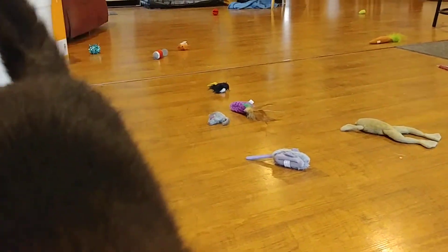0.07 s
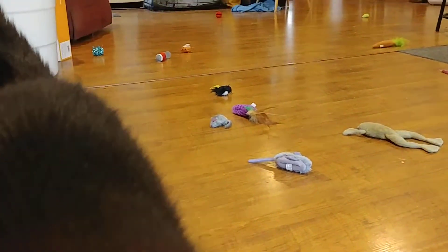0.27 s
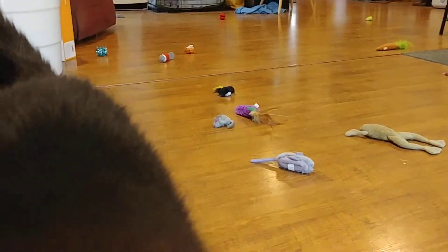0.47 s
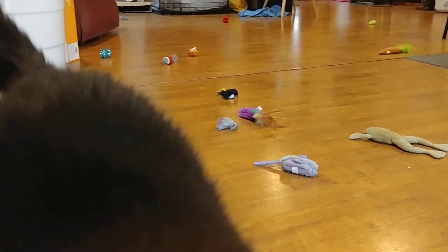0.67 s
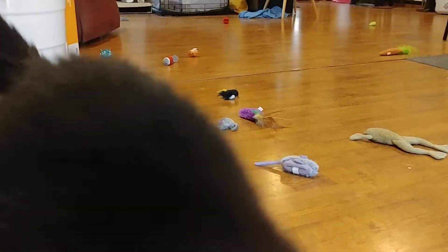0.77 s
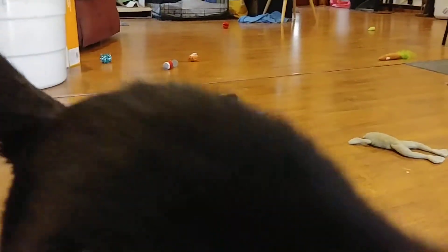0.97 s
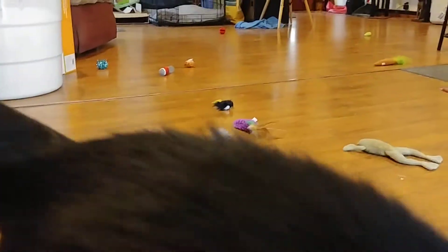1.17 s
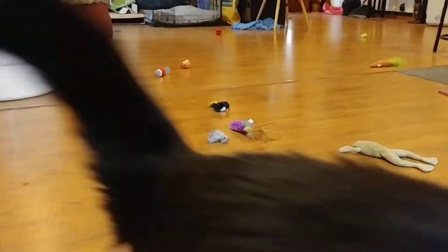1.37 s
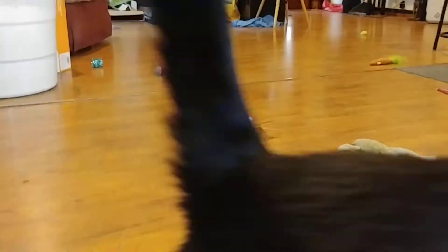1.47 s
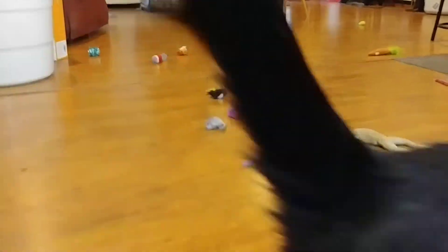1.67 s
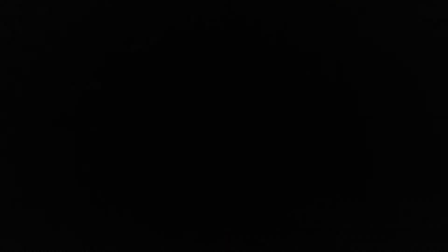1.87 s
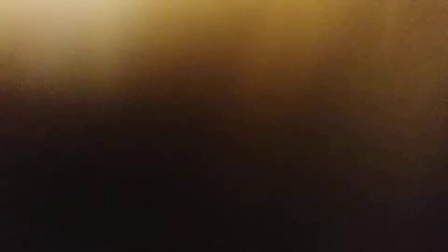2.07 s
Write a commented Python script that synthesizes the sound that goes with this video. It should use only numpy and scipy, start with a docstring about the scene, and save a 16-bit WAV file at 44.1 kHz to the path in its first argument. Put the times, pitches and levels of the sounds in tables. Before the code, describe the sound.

Fur brushes right on a phone's microphone indoors, faint over a low hum. A soft knock and a few muffled paw steps pass before a sudden overloaded thump and a rough, rumbling rub that shifts between left and right.

```python
"""A quiet room, where a cat walks along a phone. Its fur whispers over the left microphone port,
and something knocks softly on the case and bounces. Then the cat bumps into the phone: its coat
scrapes across the left port, the right port and the left again, pushing in puffs of air that
boom and briefly overload the microphones. Paw steps, floor scuffs and a low hum lie behind."""
import sys
import numpy as np
from scipy import signal
from scipy.fft import rfft, irfft
from scipy.io import wavfile

SR = 44100
rng = np.random.default_rng(int(sys.argv[2]) if len(sys.argv) > 2 else 0)


def bounce(signal):
    """Save signal as a 16-bit WAV file at the path given by the first command-line argument."""
    frames = np.transpose(np.atleast_2d(signal))
    limited = np.clip(frames, -1, 1)
    pcm = np.round(limited * 32767).astype(np.int16)
    wavfile.write(sys.argv[1], SR, pcm)


N = 92786
T, FREQS = np.arange(N) / SR, np.fft.rfftfreq(N, 1 / SR)


# coat pressed on the ports (time [s], left level [dB], right level [dB])
COAT_LEVELS = [(1.64, -70.5, -69.5), (1.731, -63, -68), (1.739, -32.5, -67), (1.752, -33.5, -30),
               (1.778, -36, -38), (1.803, -25, -36), (1.83, -35.5, -34), (1.87, -37.5, -27.5),
               (1.9, -44.5, -31.5), (1.96, -47, -36.5), (2.0, -46.5, -36), (2.035, -54, -46),
               (2.06, -42.5, -46), (2.1, -28, -37.5)]
# case rumbling as the cat leans on it (time [s], level [dB])
RUMBLE_LEVELS = [(1.68, -63), (1.75, -20.5), (1.87, -27.5), (1.94, -33), (2.1, -42)]
# spectra of the scrape at each port and of the rumble (frequency [Hz], gain [dB])
LEFT_SPECTRUM = [(250, -1.5), (450, 9.5), (650, 1.5), (950, 1.5), (1800, -4), (3000, -0.5), (4800, -0.5),
                 (6600, -10), (8000, -8.5), (9200, -25.5), (10200, -57), (12500, -36.5), (15500, -42)]
RIGHT_SPECTRUM = [(250, 4.5), (500, -4), (730, 2), (810, 0.5), (890, 1.5), (1050, -3), (1400, -3),
                  (1900, -9), (2500, -4), (2950, -7.5), (3400, -8.5), (4200, -10.5), (5500, -16.5),
                  (7000, -25.5), (8300, -21), (9400, -31.5), (10200, -56), (15500, -43)]
RUMBLE_SPECTRUM = [(40, 18), (90, -7), (160, 0), (300, -23), (700, -71), (2000, -60)]

def coat_scrape():
    """Sliding friction: the pressed coat scratches each port separately and makes the case rumble."""
    rumble = envelope(RUMBLE_LEVELS) * stereo_noise(RUMBLE_SPECTRUM)
    left = envelope(COAT_LEVELS, column=1) * hair_friction(LEFT_SPECTRUM)
    right = envelope(COAT_LEVELS, column=2) * hair_friction(RIGHT_SPECTRUM)
    return np.array([left, right]) + rumble


def hair_friction(spectrum, flicks_per_s=5000, flick_share=0.4, spread_db=0.5, flutter_db=1.7):
    """Shot noise: hairs flick over a port's edge in clumps, above a smooth sliding hiss."""
    flicks = (rng.random(N) < flicks_per_s / SR) * rng.choice([-1, 1], N)
    strength = amp(spread_db * np.minimum(rng.exponential(1, N), 5))
    hiss = rng.standard_normal(N)
    drive = np.sqrt(flick_share) * unit(flicks * strength) + np.sqrt(1 - flick_share) * hiss
    clumping = amp(flutter_db * wander(rate_hz=270))
    return colour(drive * clumping, spectrum)


# air pushed into the ports (time [s], half width [ms], left level [dB], right level [dB])
PUFFS = [(.323, 1.04, -56, -37), (0.599, 1.29, -53, -35.5), (0.95, 1.37, -49, -39.5),
         (1.364, 1.3, -60, -37.5), (1.7419, 0.78, -7, -50), (1.7471, 1.074, 7, -55), (1.7487, 0.67, -29, 3),
         (1.752, 4.3, -7.5, -5), (1.8227, 1.8, -36, -13), (1.8321, 1.45, -43, -18),
         (1.8396, 1.9, -30, -3.5), (1.8505, 3.14, -28, -1), (2.0198, 1.9, -51, -17)]

def air_puffs(backflow_share=0.63, lag_half_widths=1.69):
    """Compression and release: a touch traps air in a port and lets it go, a bipolar pressure pulse."""
    out = np.zeros((2, N))
    for time, half_width_ms, left_db, right_db in PUFFS:
        half_widths = (T - time) * 1000 / half_width_ms
        push = np.exp(-half_widths ** 2)
        backflow = backflow_share * np.exp(-(half_widths - lag_half_widths) ** 2)
        out += amp([[left_db], [right_db]]) * (backflow - push)
    return out


# the body landing on the phone (time [s], left level [dB], right level [dB])
BUMP = (1.7462, -18, -16.5)
# spectrum of crushed hair (frequency [Hz], gain [dB])
CRUSH_SPECTRUM = [(150, -27.5), (350, -17), (700, 6.5), (1200, 6), (2000, -7.5), (3500, 1.5), (5000, -29),
                  (8000, -21), (11000, -61), (15500, -41)]

def bump_crack(decay_s=.0017):
    """Impact transient: hair crushed against the case gives a burst of noise."""
    time, left_db, right_db = BUMP
    noise = [amp(db) * colour(rng.standard_normal(N), CRUSH_SPECTRUM) for db in (left_db, right_db)]
    return decays([(time, 0)], decay_s) * np.array(noise)


# a knock and its bounces (time [s], relative level [dB], force rise time [ms])
BOUNCES = [(.4339, -17.5, .13), (.4516, -21.5, .17), (.4696, -25, .24), (.5032, -30.5, .3)]
# modes of the case (frequency [Hz], gain [dB], time to fall 60 dB [s])
CASE_MODES = [(88.4, -3, 0.16), (157, 1, 0.072), (340, 1.5, 0.011), (612, 10, 0.008), (930, 0, 0.0098),
              (1970, -8.5, .006)]
# spectrum of the scuff at each contact (frequency [Hz], gain [dB])
SCUFF_SPECTRUM = [(100, 6), (300, 18.5), (600, 5.5), (1200, -7), (2300, -6.5), (3200, -19), (4500, -20),
                  (7000, -28), (15000, -38)]

def case_knock(scuff_db=-27.5):
    """Damped modal vibration: ever softer contacts ring and scuff the case next to the right port."""
    blows = np.zeros(N)
    for time, db, rise_ms in BOUNCES:
        rise_times = T[:SR // 100] * 1000 / rise_ms
        force = rise_times * np.exp(-rise_times)
        add(blows, time, amp(db) * force / force.sum())
    t = T[:SR // 3]
    ring = sum(amp(db - 60 * t / t60) * np.sin(2 * np.pi * hz * t) for hz, db, t60 in CASE_MODES)
    body = signal.fftconvolve(blows, ring)[:N]
    scuff = amp(scuff_db) * decays(BOUNCES, decay_s=0.03) * stereo_noise(SCUFF_SPECTRUM)
    return body * amp([[-28], [0]]) + scuff * amp([[-6], [0]])  # both weaker on the left


# light brushing at the left port (time [s], level [dB])
BRUSH_LEVELS = [(0, -69), (.03, -67.5), (.12, -65.5), (.19, -80), (.275, -79.5), (.322, -63.5), (.39, -83),
                (.45, -71), (.538, -81), (.572, -61), (.602, -55.5), (.64, -58), (.68, -80), (.765, -80),
                (.8, -65), (.85, -67), (.935, -75), (.986, -53), (1.068, -67), (1.2, -61), (1.268, -51),
                (1.315, -72), (1.345, -68), (1.4, -97), (1.61, -84), (1.665, -64), (1.731, -56.5),
                (1.739, -33.5), (1.77, -42.5), (1.81, -39), (1.88, -68)]
# firmer strokes there (time [s], half width [s], level [dB])
FIRM_STROKES = [(.605, 0.026, -62), (.995, 0.031, -66), (1.165, .03, -74), (1.258, 0.026, -77),
                (1.715, 0.035, -74)]
# spectra of light and firm contact (frequency [Hz], gain [dB])
BRUSH_SPECTRUM = [(1500, -28), (3000, -18), (4600, -11.5), (6500, -11), (7300, -7), (7850, 3.5), (8300, -3),
                  (8900, -7.5), (10300, -26.5), (12500, -21), (15000, -14.5)]
SWISH_SPECTRUM = [(800, -2), (1800, -14), (3000, 8), (4600, -2), (6400, 4), (9000, -4.5), (10300, -28),
                  (13000, -8), (15500, -17)]

def fur_brush(right_leak_db=-12):
    """Resonance: hair tips excite a narrow peak of the left port; firm strokes add a broad swish."""
    light, firm = envelope(BRUSH_LEVELS), swells(FIRM_STROKES)
    ports = [light * hair_friction(BRUSH_SPECTRUM) + firm * hair_friction(SWISH_SPECTRUM)
             for _ in range(2)]
    return amp([[0], [right_leak_db]]) * np.array(ports)


# thin squeaks (time [s], half width [s], frequency [Hz], left level [dB], right level [dB])
HAIR_SQUEAKS = [(.005, 0.017, 5350, -67, -73), (1.275, 0.05, 5450, -72, -77),
                (1.349, .02, 5300, -68.5, -78), (1.7, 0.038, 4200, -78, -68.5),
                (1.879, 0.0094, 2500, -45, -47)]

def hair_squeaks(half_band_hz=340):
    """Narrow-band friction noise: hair sliding on the case gives fuzzy whistles."""
    out = np.zeros((2, N))
    hiss_spectrum = rfft(rng.standard_normal((2, N)))
    for time, half_width, hz, left_db, right_db in HAIR_SQUEAKS:
        band = np.exp(-((FREQS - hz) / half_band_hz) ** 2)
        whistle = unit(irfft(hiss_spectrum * band, N))
        out += amp([[left_db], [right_db]]) * swells([(time, half_width, 0)]) * whistle
    return out


# paws landing on the floor (time [s], half width [s], level [dB])
PAW_FALLS = [(.6, 0.015, -53), (.83, 0.01, -51), (.975, 0.027, -57.5), (1.35, 0.0092, -48)]
# spectrum of a step (frequency [Hz], gain [dB])
PAW_SPECTRUM = [(50, -2), (90, 4.5), (200, -9), (450, -13.5), (900, -22.5), (2000, -38), (6000, -45)]

def paw_steps():
    """Cushioned impact: a soft paw loads the floor slowly, so low frequencies dominate."""
    return swells(PAW_FALLS) * stereo_noise(PAW_SPECTRUM)


# faint scuffs on the floor (time [s], level [dB])
FLOOR_SCUFFS = [(.204, -62), (.856, -54)]
# their spectrum (frequency [Hz], gain [dB])
FLOOR_SPECTRUM = [(300, -5), (600, 1), (1050, 6), (1500, -3), (2500, -1), (3500, -11), (6000, -25),
                  (12000, -36)]

def floor_scuffs(direct_decay_s=0.0025, room_decay_s=0.036, room_db=-8):
    """Reverberation: a short room tail follows each small scuff on the wooden floor."""
    direct = decays(FLOOR_SCUFFS, direct_decay_s)
    tail = amp(room_db) * decays(FLOOR_SCUFFS, room_decay_s)
    return (direct + tail) * stereo_noise(FLOOR_SPECTRUM)


# spectrum of the room's air noise (frequency [Hz], gain [dB])
AIR_SPECTRUM = [(30, -11), (60, 11), (100, 1), (180, -8.5), (300, -13.5), (550, -18), (1100, -29),
                (2500, -32.5), (5000, -41), (10000, -45), (15500, -37.5)]
# low hum (start [s], end [s], frequency [Hz], level [dB])
HUM_TONES = [(-.1, 1.16, 123, -59), (1.36, 1.9, 82.7, -51.5), (1.36, 1.9, 146, -60),
             (1.891, 2.2, 88, -44.5), (1.89, 2.2, 144, -53)]

def room_tone(air_db=-53.5, coherence=0.35, waver_hz=1.95, waver_db=1.0, fade_s=0.038):
    """Ambient noise: dull air noise, partly coherent between the ports, and a wavering low hum."""
    shared, left, right = rng.standard_normal((3, N))
    air = np.sqrt(coherence) * shared + np.sqrt(1 - coherence) * np.array([left, right])
    out = amp(air_db) * colour(air, AIR_SPECTRUM)
    for start, end, hz, db in HUM_TONES:
        gate = np.clip(np.minimum(T - start, end - T) / fade_s, 0, 1)
        amplitude = np.sqrt(2) * amp(db + waver_db * wander(rate_hz=8))
        phase = 2 * np.pi * np.cumsum(hz + waver_hz * wander(rate_hz=11.2)) / SR
        out += gate * amplitude * np.sin(phase)
    return out


def amp(db):
    """Decibels to amplitude gain."""
    return 10 ** (np.asarray(db) / 20)


def unit(x):
    """Normalisation to rms 1."""
    return x / np.sqrt(np.mean(x ** 2) + 1e-20)


def add(mix, time, sound):
    """Superposition of a sound on the mix, from a time in seconds."""
    part = mix[..., max(round(time * SR), 0):][..., :sound.shape[-1]]
    part += sound[..., :part.shape[-1]]


def colour(x, spectrum):
    """Spectral shaping of x, at rms 1."""
    hz, db = np.transpose(spectrum)
    gain = amp(np.interp(np.log(FREQS + 1), np.log(hz), db))
    return unit(irfft(rfft(x) * gain, N))


def stereo_noise(spectrum):
    """Incoherent coloured noise at the two ports, at rms 1."""
    return colour(rng.standard_normal((2, N)), spectrum)


def wander(rate_hz):
    """Random modulation: low-passed noise at rms 1."""
    return unit(irfft(rfft(rng.standard_normal(N)) / (1 + (FREQS / rate_hz) ** 4), N))


def envelope(curve, column=1):
    """Gain interpolated along a decibel curve."""
    points = np.transpose(curve)
    return amp(np.interp(T, points[0], points[column]))


def swells(events):
    """Gaussian envelopes; each half width is one standard deviation."""
    return sum(amp(db) * np.exp(-((T - time) / half_width) ** 2 / 2) for time, half_width, db in events)


def decays(events, decay_s):
    """Exponential decay: the gain jumps at each event and dies away."""
    return sum(amp(db) * (T >= time) * np.exp(-np.abs(T - time) / decay_s) for time, db, *_ in events)


def scene():
    """Superposition: all sources add at the two ports."""
    fur = fur_brush() + hair_squeaks() + coat_scrape()
    impacts = bump_crack() + air_puffs() + case_knock()
    return fur + impacts + paw_steps() + floor_scuffs() + room_tone()


def record(dry, low_cut_hz=62, band_edge_hz=15780, fade_out_s=.002):
    """Filter ringing: a steep low cut turns each puff into a short boom; clipping; band limiting."""
    high_pass = signal.butter(N=7, Wn=low_cut_hz, btype="high", fs=SR, output="sos")
    low_pass = signal.firwin(1023, band_edge_hz, window=("kaiser", 9), fs=SR)
    clipped = np.clip(signal.sosfilt(high_pass, dry), -1, 1)
    fade = np.minimum((T[-1] - T) / fade_out_s, 1)
    return signal.oaconvolve(fade * clipped, low_pass[None], "same")


dry = scene()
out = record(dry)
bounce(out)
```